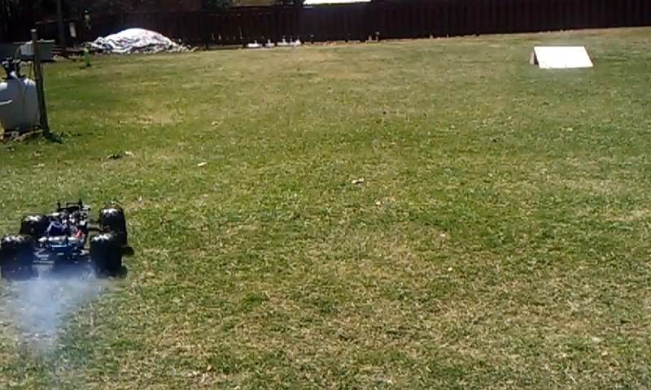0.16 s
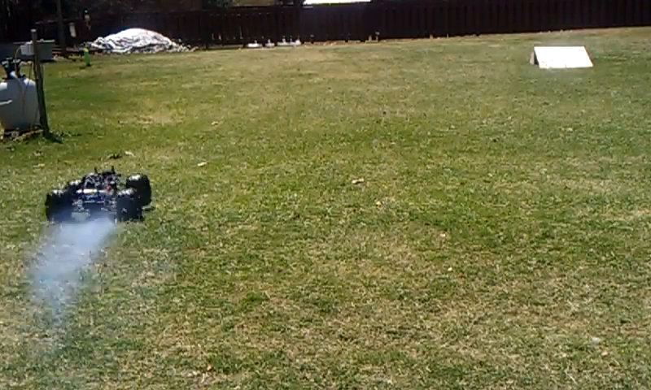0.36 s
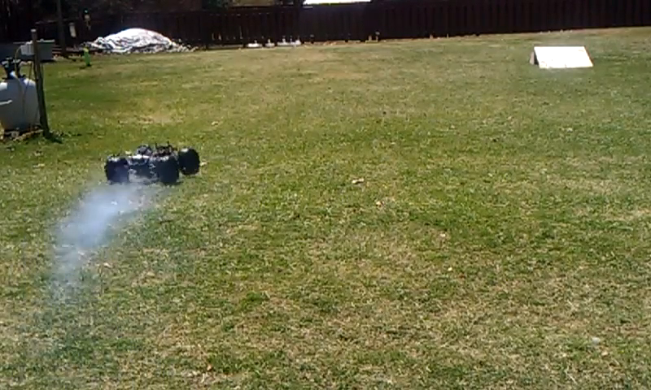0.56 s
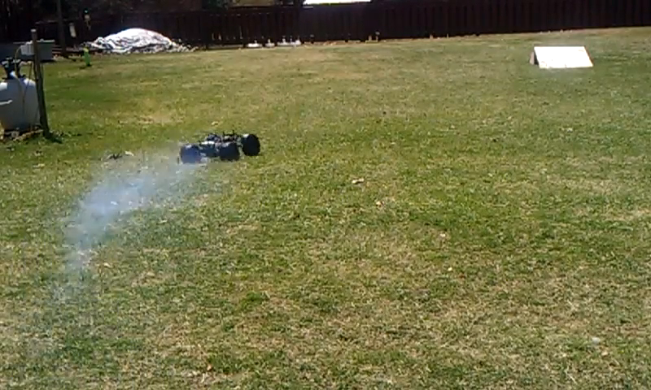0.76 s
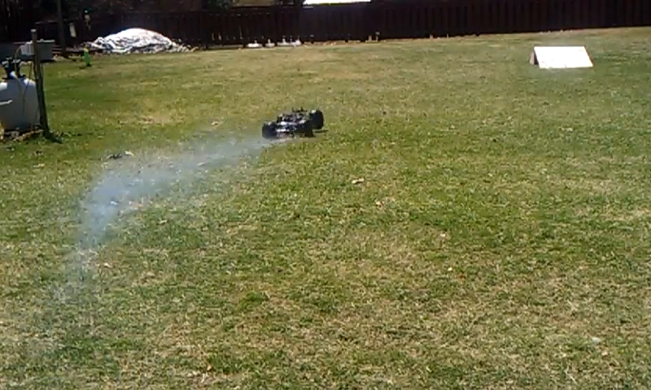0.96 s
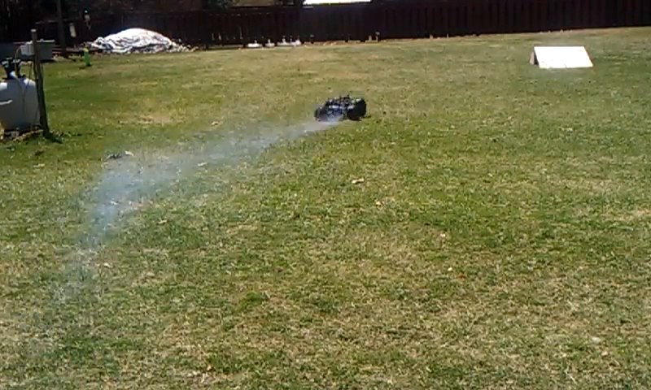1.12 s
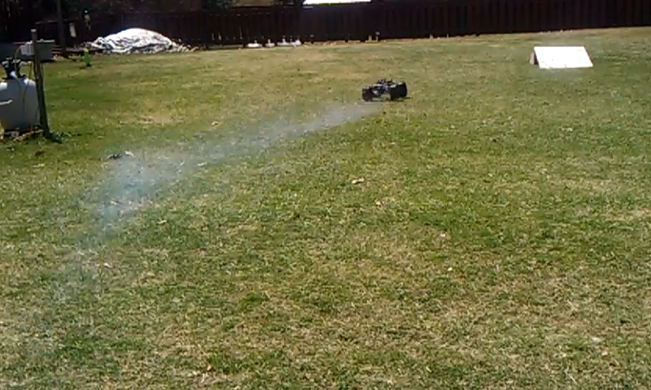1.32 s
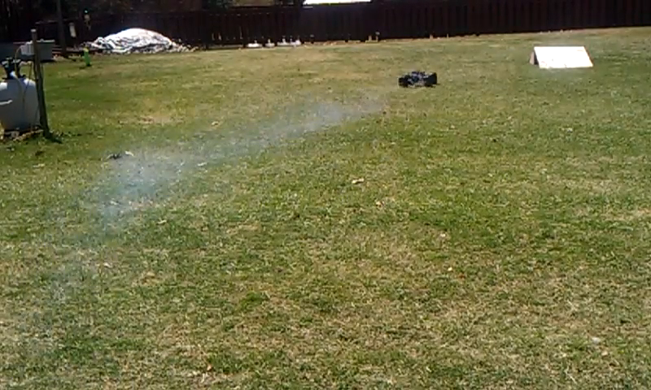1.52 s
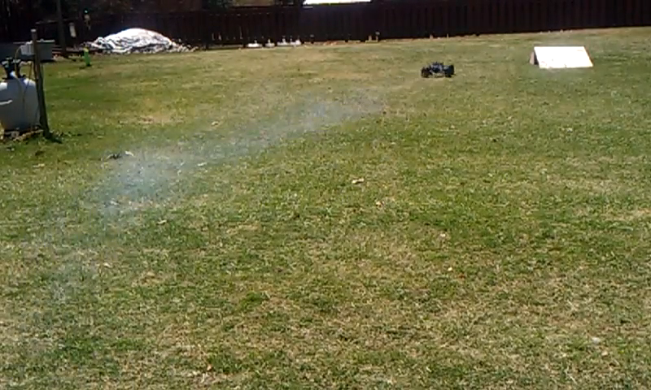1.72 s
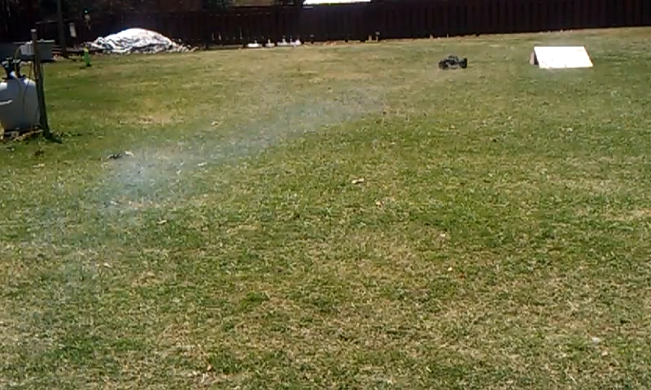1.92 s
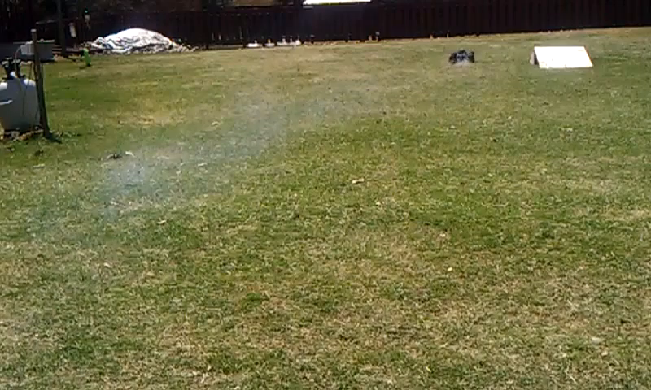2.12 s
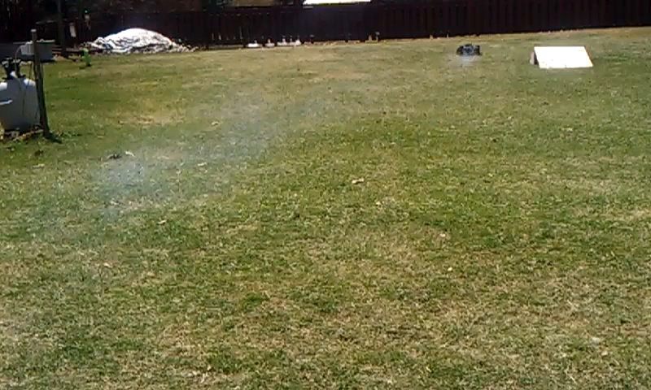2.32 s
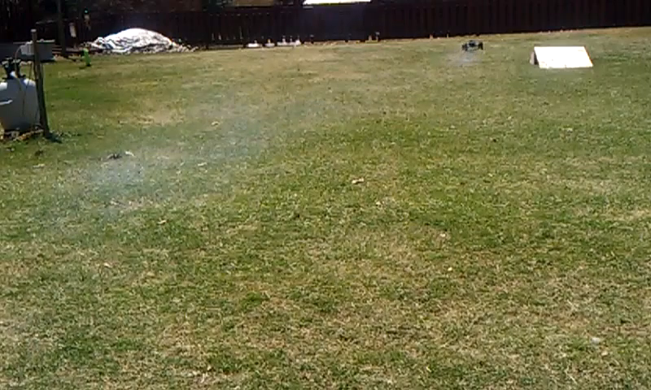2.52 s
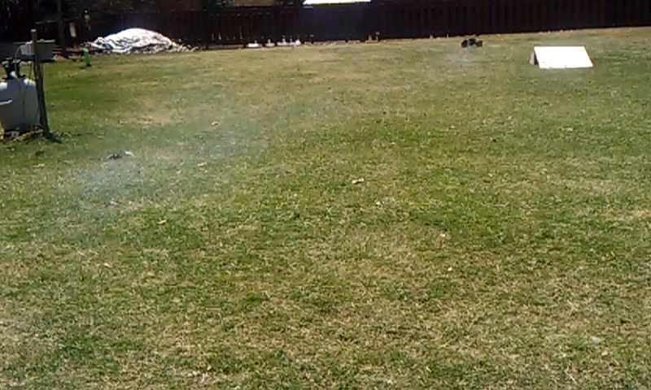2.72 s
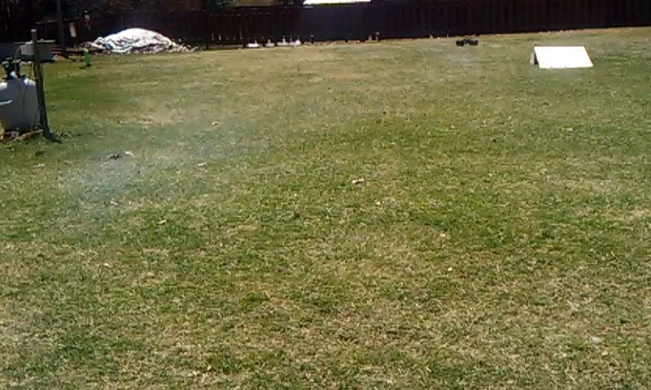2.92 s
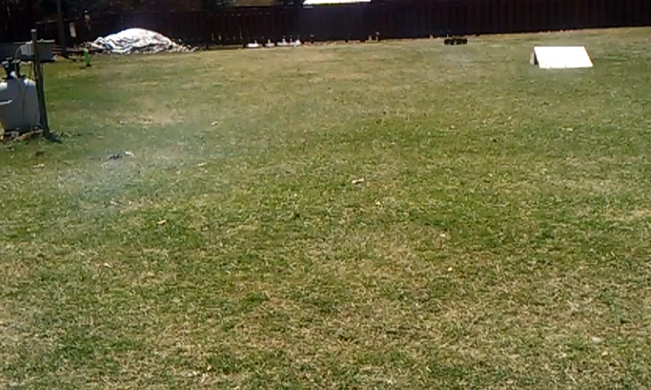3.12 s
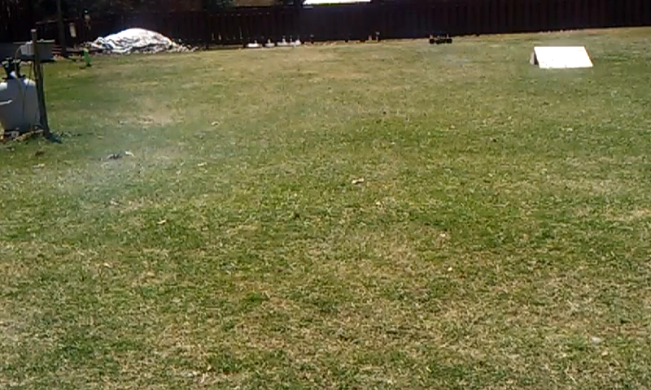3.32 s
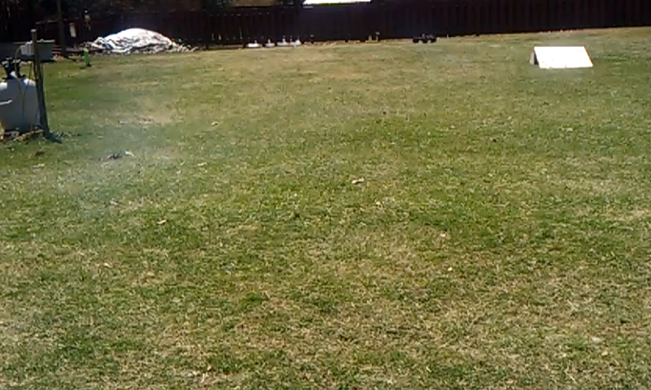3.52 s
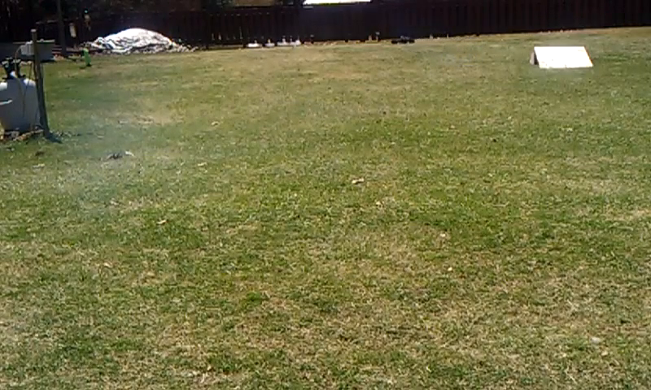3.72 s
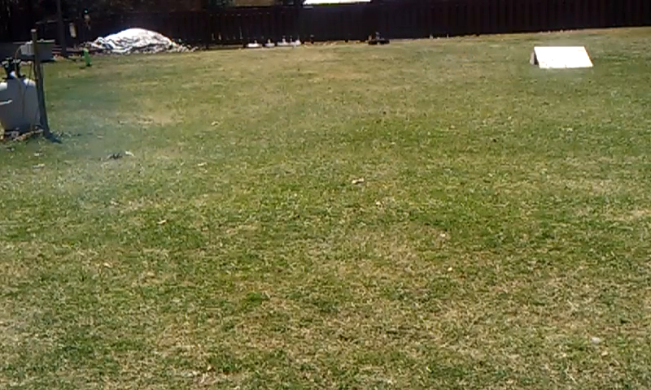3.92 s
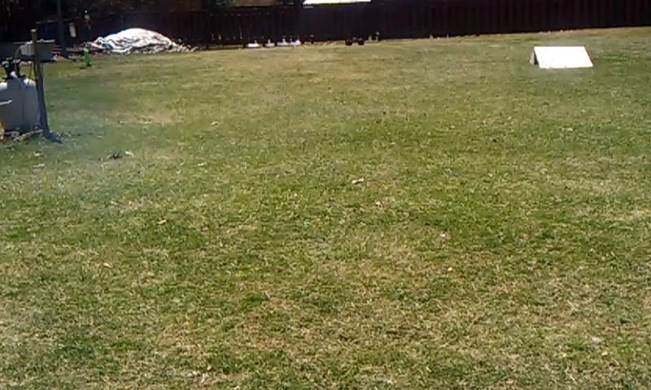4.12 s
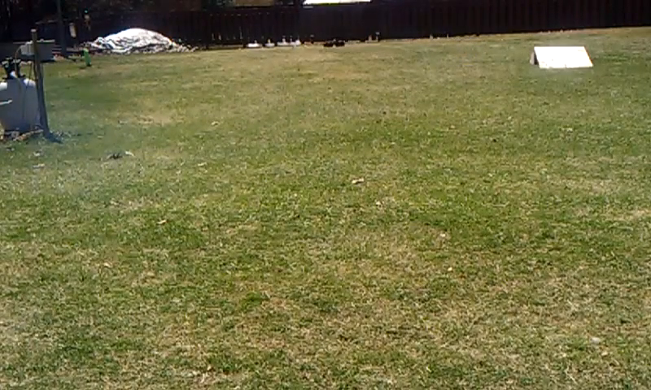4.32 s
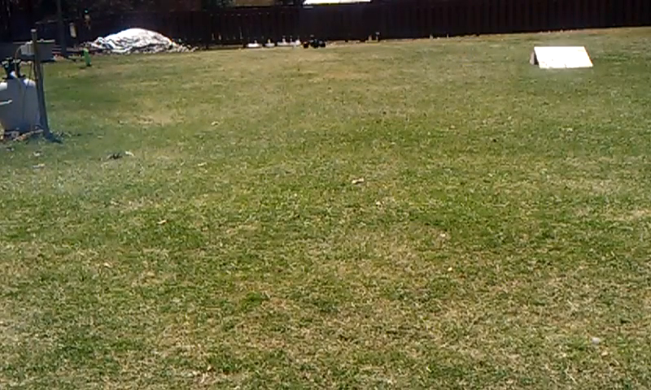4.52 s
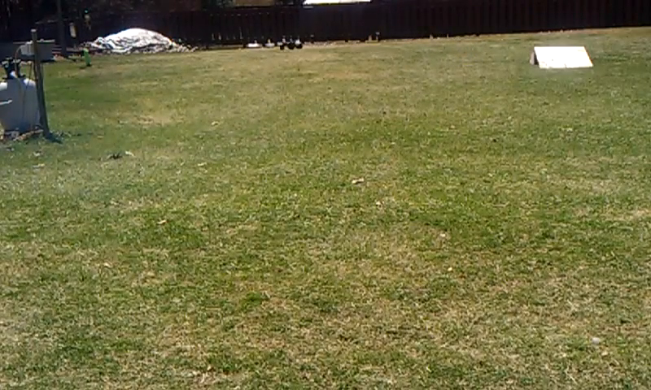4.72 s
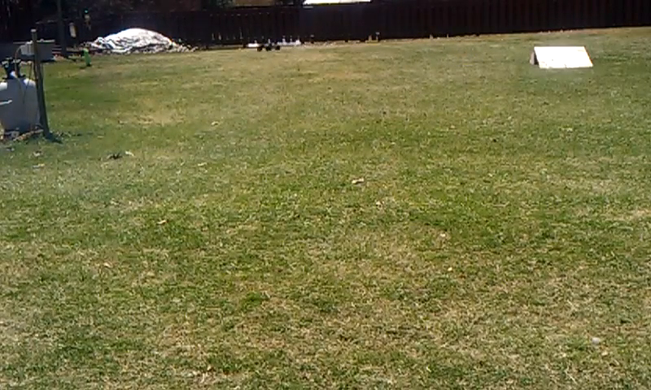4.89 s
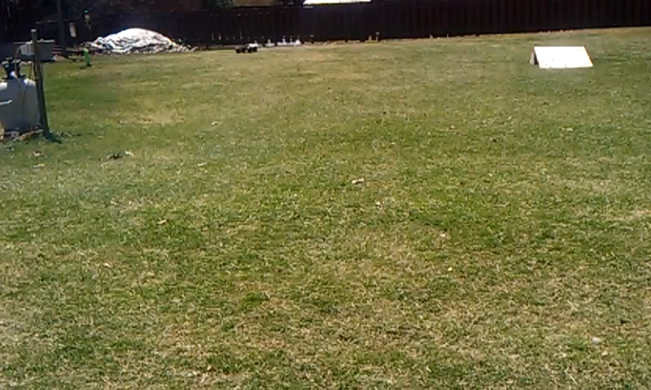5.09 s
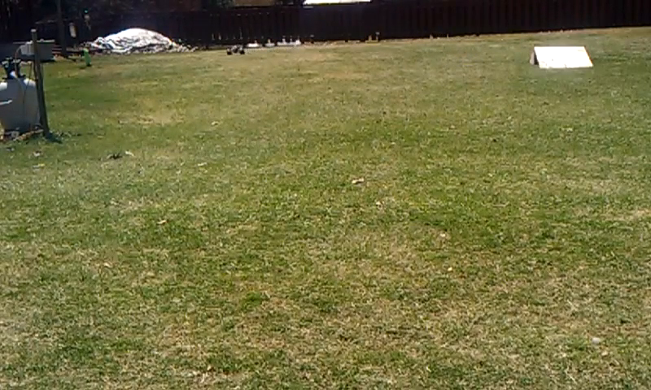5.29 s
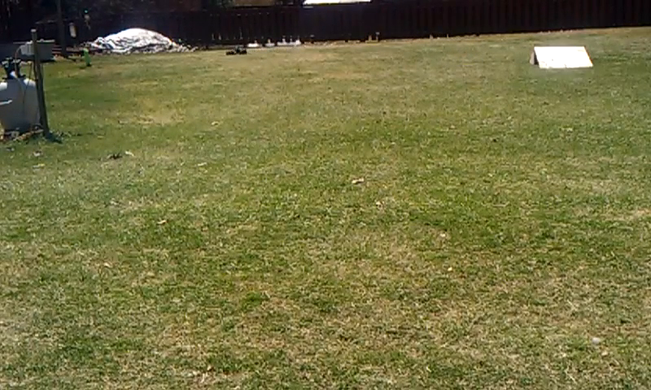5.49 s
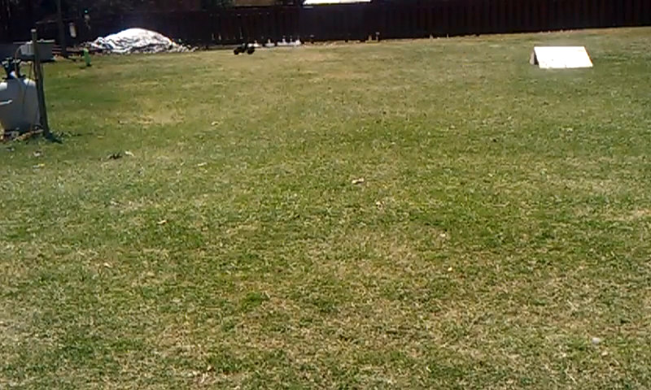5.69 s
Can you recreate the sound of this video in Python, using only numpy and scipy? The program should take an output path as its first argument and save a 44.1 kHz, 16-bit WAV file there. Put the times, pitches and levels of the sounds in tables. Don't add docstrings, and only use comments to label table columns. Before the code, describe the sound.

A toy car's tiny two-stroke engine starts close and loud, a raspy, rising buzz that wavers as the wheels slip. It surges once more, runs down to a thin metallic idle, blips sharply near two seconds, then idles farther off. Two weaker revs come near the end. Open garden, faint late fence echo, soft hush and wind bumps on a small camera microphone.

```python
import sys
import numpy as np
from scipy import signal
from scipy.fft import rfft, irfft
from scipy.io import wavfile
from scipy.ndimage import uniform_filter1d

SR = 44100
rng = np.random.default_rng(int(sys.argv[2]) if len(sys.argv) > 2 else 0)


def wav_record(signal):
    frames = np.transpose(np.atleast_2d(signal))
    bounded = np.clip(frames, -1, 1)
    quanta = np.round(bounded * 32767).astype(np.int16)
    wavfile.write(sys.argv[1], SR, quanta)


def gain_from_db(level_db):
    decades = np.asarray(level_db, float) / 20
    return 10 ** decades


N = 253565
TIME = np.arange(N) / SR


def unit(x):
    return x / np.sqrt(np.mean(x ** 2))


def walk(rate):
    size = N // 8 + 1
    hold = max(int(SR / 8 / rate), 2)
    levels = rng.standard_normal(size // hold + 2)
    steps = np.interp(np.arange(size) / hold, np.arange(len(levels)), levels)
    return 1.3 * uniform_filter1d(steps, hold).repeat(8)[:N]


def colour(x, gain):
    size = 2 ** 12
    cepstrum = irfft(np.log(gain(np.arange(size // 2 + 1) * SR / size) + 1e-6))
    cepstrum[1:size // 2] *= 2
    cepstrum[size // 2 + 1:] = 0
    response = irfft(np.exp(rfft(cepstrum)))
    return signal.fftconvolve(x, response)[:N]


def ring(x, modes, steep):
    def gain(f):
        power = sum(gain_from_db(db) ** 2 / (1 + (2 * (f - hz) / width) ** 2) ** steep for hz, width, db in modes)
        return np.sqrt(power)
    return unit(colour(x, gain))


# (time [s], firing rate [Hz],
# level [dB])
LAUNCH_PULL = [(0.0, 320.8, -10), (0.18, 364.4, -10.5), (0.205, 328.7, -13.5), (0.349, 367.7, -11),
               (0.544, 388.7, -13.5), (0.57, 365.4, -13.5), (0.701, 420.2, -13), (0.76, 392.6, -16),
               (1.064, 397.3, -17.5), (1.148, 466.6, -16), (1.287, 452.6, -21)]
# (time [s], firing rate [Hz], level [dB])
BLIP_PULL = [(2.035, 194.3, -36), (2.062, 248.8, -26.5), (2.107, 364.9, -19.5), (2.144, 408, -18.5),
             (2.301, 469, -24.5)]
# (time [s], firing rate [Hz], level [dB])
TURN_PULL = [(4.365, 196.3, -60), (4.406, 237, -37.5), (4.486, 275.6, -32.5), (4.56, 328.6, -27),
             (4.796, 390.7, -25.5), (4.9, 406.6, -27.5), (4.95, 402.4, -32.5)]
# (time [s], firing rate [Hz], level [dB])
EXIT_PULL = [(5.44, 189.3, -68), (5.484, 257, -40.5), (5.569, 347.7, -30), (5.641, 381.5, -29.5),
             (5.75, 398, -27.5)]
# (regular share [0-1], first drop of revs [0-1], run-down time [s], fade [dB/s])
PULL_ENDINGS = [
    (1, .2, .4, 32.5),
    (0.89, .1, .22, 50.5),
    (0.58, 0, 0.12, 112),
    (0.54, .03, .2, 60),
]
# (time [s], distance [m], idle firing rate [Hz], idle level [dB])
DRIVE_AWAY = [(0, 4.1, 193, -30), (1.3, 11.5, 192.6, -39), (1.898, 29, 192.2, -37),
              (2.75, 32.9, 185.6, -43.5), (3.501, 18.2, 185.6, -51), (4.4, 31, 184.7, -51),
              (5.1, 26.7, 184, -61.5)]


def throttle():
    stall_hz = 99.05
    overrun_clean, idle_clean = 0.21, 0.43
    snap_s, settle_s, catch_s = 0.025, 0.17, 0.08
    s, _, idle_hz, idle_db = np.transpose(DRIVE_AWAY)
    hz = np.interp(TIME, s, idle_hz)
    db = np.interp(TIME, s, idle_db)
    clean = np.full(N, idle_clean)
    overrun = np.zeros(N)
    pulls = [LAUNCH_PULL, BLIP_PULL, TURN_PULL, EXIT_PULL]
    for pull, (share, drop, down_s, fade) in zip(pulls, PULL_ENDINGS):
        s, pull_hz, pull_db = np.transpose(pull)
        begun = TIME >= s[0]
        since = np.maximum(TIME - s[-1], 0)
        run_down = np.exp(-since / down_s) * (1 - drop * (1 - np.exp(-since / snap_s)))
        revs = stall_hz + (np.interp(TIME, s, pull_hz) - stall_hz) * run_down
        level = np.interp(TIME, s, pull_db) - fade * since
        hz = np.where(begun, np.maximum(hz, revs), hz)
        db = np.where(begun, np.maximum(db, level), db)
        shut = (since > 0) * np.exp(-since / settle_s)
        caught = np.clip((TIME - s[0]) / catch_s, 0, 1) if s[0] > 0 else 1
        pulling = clean + caught * (share - clean)
        coasting = clean - shut * (idle_clean - overrun_clean)
        clean = np.where(begun & (since == 0), pulling, coasting)
        overrun += shut
    smooth = SR // 40
    return hz, db, np.clip(uniform_filter1d(clean, smooth), 0, 1), uniform_filter1d(overrun, smooth)


def firings(hz, rolling):
    overtones = 46
    unsteady = 1 + (0.0015 + 0.007 * rolling) * walk(110)
    angle = 2 * np.pi * np.cumsum(hz * unsteady) / SR
    train = np.zeros(N)
    lags = rng.uniform(0, 2, overtones)
    for k in range(2, overtones):
        flicker_db = (1.5 + 3.6 * rolling) * walk(34 + 5 * k)
        audible = k * hz < SR / 2.2
        train += gain_from_db(flicker_db) * np.cos(k * angle + np.pi * lags[k]) * audible
    return angle, train * np.sqrt(3 * hz / SR)


# (frequency [Hz], width [Hz], level [dB])
BELLY_MODES = [(780, 350, 0)]
# (frequency [Hz], width [Hz], level [dB])
PIPE_MODES = [(1230, 350, -3), (1700, 400, -5), (2100, 500, 0)]
# (frequency [Hz], width [Hz], level [dB])
STINGER_MODES = [(2450, 300, -9), (2900, 520, 0)]
# (frequency [Hz], width [Hz], level [dB])
JET_MODES = [(3750, 1100, -18), (4750, 900, -14), (5500, 600, -8), (6250, 1100, 0), (8450, 900, -13)]
# (frequency [Hz], width [Hz], level [dB])
SIZZLE_MODES = [(9670, 400, -7), (10810, 960, 3.5), (13300, 2400, -27), (18400, 5100, 0)]
# (frequency [Hz], width [Hz], level [dB])
RASP_MODES = [(3660, 400, 0.5), (4105, 400, 11)]
# (frequency [Hz], width [Hz], level [dB])
CASING_MODES = [(1300, 150, -9), (1950, 450, -8), (2550, 350, -7), (5370, 260, 1), (5790, 150, -1),
                (9950, 250, -12)]


def engine(hz, first_db, jet_db, pipe_db, sizzle_db, rasp_db, clean, grass_db):
    rolling = np.clip((hz - 200) / 80, 0, 1)
    angle, train = firings(hz, rolling)
    cycle = (angle / (2 * np.pi)).astype(int)
    puff = gain_from_db(0.6 * rng.standard_normal(N // 50)[cycle])
    gas = unit((1 + 0.14 * np.cos(angle - 0.8)) * puff * rng.standard_normal(N))

    def mix(share):
        return np.sqrt(share) * train + np.sqrt(1 - share) * gas

    bang = mix(1 - (1 - clean) ** 1.5)
    belly = ring(bang, BELLY_MODES, steep=2.46) * gain_from_db(pipe_db - 16.5 + 0.47 * grass_db)
    pipe = ring(bang, PIPE_MODES, steep=2.5) * gain_from_db(pipe_db - 3.5 + grass_db)
    stinger = ring(mix(0.82 * clean ** 2), STINGER_MODES, steep=2.29) * gain_from_db(pipe_db - 2.5)
    jet = ring(mix(0.45 * clean), JET_MODES, steep=2.5) * gain_from_db(jet_db - 0.7)
    sizzle = ring(mix(0.17 * clean), SIZZLE_MODES, steep=1.35) * gain_from_db(sizzle_db + 0.4)
    rasp = ring(mix(0.083 * clean), RASP_MODES, steep=2.68) * gain_from_db(rasp_db)
    casing = ring(mix(1.8 * np.minimum(clean, 0.5)), CASING_MODES, steep=2)
    casing *= gain_from_db(np.maximum(jet_db, -49) - 3.5)
    first = np.sqrt(2) * np.cos(angle) * gain_from_db(first_db + 0.8 + 1.4 * walk(30))
    body = (0.3 + 0.7 * rolling) * (belly + pipe + stinger)
    body += (0.7 + 0.3 * rolling) * jet + sizzle + rasp
    idle = (1 - rolling) * np.minimum(2 * clean, 1) * casing
    return first + gain_from_db(0.9 * walk(22)) * (body + idle)


# (time [s], echo delay [s])
FENCE_DELAY = [(0, 0.081), (2.0, 0.05), (4.4, .09), (5.75, 0.084)]


def fence(x, echo_db):
    lag = np.interp(TIME, *np.transpose(FENCE_DELAY))
    late = np.interp(TIME - lag, TIME, x, left=0)
    smear = rng.standard_normal(SR // 10) * np.exp(-np.arange(SR // 10) / (0.017 * SR))
    smear /= np.sqrt(np.sum(smear ** 2))
    return gain_from_db(echo_db) * signal.fftconvolve(late, smear)[:N]


# (frequency [Hz], level per Hz [dB])
HUSH_COLOUR = [(30, -13.5), (150, 0), (450, -7.5), (1100, 0.5), (2200, -4), (4500, -2.5), (5700, 6.5),
               (6600, 1.5), (7600, 2), (9200, -25), (9800, -6.5), (11500, -32), (17000, -18.5)]
# (time [s], peak level [dB], centre frequency [Hz], length [s])
WIND_BUMPS = [(0.116, -66, 120, 0.12), (0.352, -42.5, 89, 0.11), (.55, -45, 60, 0.16),
              (0.893, -42, 57.8, .06), (1.133, -54, 67.6, 0.14), (1.502, -50, 65.2, 0.12),
              (2.034, -40.5, 150.3, 0.04), (2.667, -55, 80.4, 0.048), (2.975, -49.5, 60.8, 0.032),
              (3.076, -54, 58.8, 0.044), (4.39, -54, 39.6, 0.045), (5.14, -55, 60.3, 0.042)]


def garden(duck_db):
    hz, db = np.transpose(HUSH_COLOUR)
    hush = colour(rng.standard_normal(N), lambda f: gain_from_db(np.interp(np.log(f + 1), np.log(hz), db)))
    wind = ring(rng.standard_normal(N), [(45.3, 68, -3), (128, 92, -6.5)], steep=1.8)
    wind *= gain_from_db(-65.5 + 4.8 * walk(6.08))
    out = (unit(hush) * gain_from_db(-46 + 1.0 * walk(4.72)) + wind) * gain_from_db(duck_db)
    size = SR // 2
    for s, peak_db, centre_hz, length in WIND_BUMPS:
        middle = int(s * SR)
        at = slice(max(middle - size // 2, 0), middle + size // 2)
        push = np.exp(-((TIME[at] - s) / (length / 2)) ** 2)
        thud = ring(rng.standard_normal(size), [(centre_hz, centre_hz * 1.75, 0)], steep=1.8)
        thud = thud[-len(push) - 2 ** 12:-2 ** 12]
        thud = np.pad(thud, (len(push) - len(thud), 0))
        out[at] += gain_from_db(peak_db + 0.27 * duck_db[at]) * push * thud
    return out


def scene():
    hz, db, clean, overrun = throttle()
    s, metres = np.transpose(DRIVE_AWAY)[:2]
    far = np.log10(np.interp(TIME, s, metres) / 3)

    def away(near_db, per_tenfold_db):
        return near_db + per_tenfold_db * far

    first_db = np.maximum(db + away(-17.5, -12), np.minimum(-56.5, db - 7))
    first_db += away(2.3, 2.5) * (hz > 1.1 * hz.min()) * walk(21.91)
    pipe_db = db + away(-10.5, 1.5)
    sizzle_db = db + away(-11, -3.5)
    rasp_db = db + away(-23, 12.5)
    grass_db = away(0.2, -8.5) + 0.5 * overrun
    car = engine(hz, first_db, db, pipe_db, sizzle_db, rasp_db, clean, grass_db)
    echo = fence(car, away(-26, 13) + 5 * overrun)
    duck_db = -0.75 * np.clip(db + 42, 0, 22)
    return (car + echo + garden(duck_db))[None]


def band_limit(x):
    return signal.sosfilt(signal.butter(12, 18310, fs=SR, output="sos"), x)


def record(dry):
    top = signal.ellip(10, 0.2, 80, 17200, fs=SR, output="sos")
    mix = signal.sosfilt(top, np.clip(dry, -1, 1))
    return band_limit(mix)


dry = scene()
out = record(dry)
wav_record(out)
```